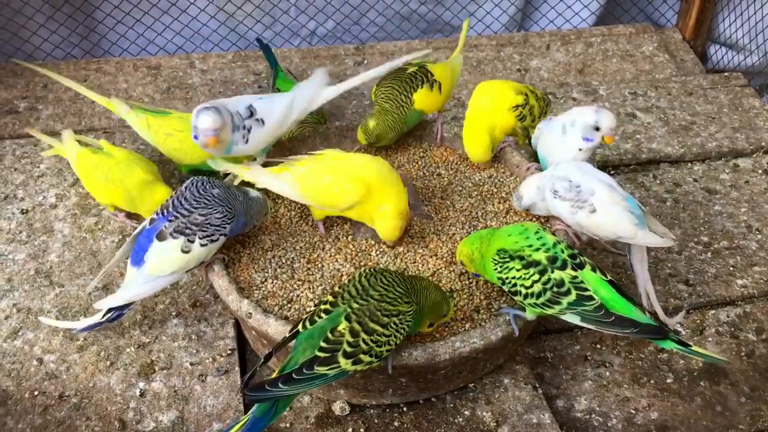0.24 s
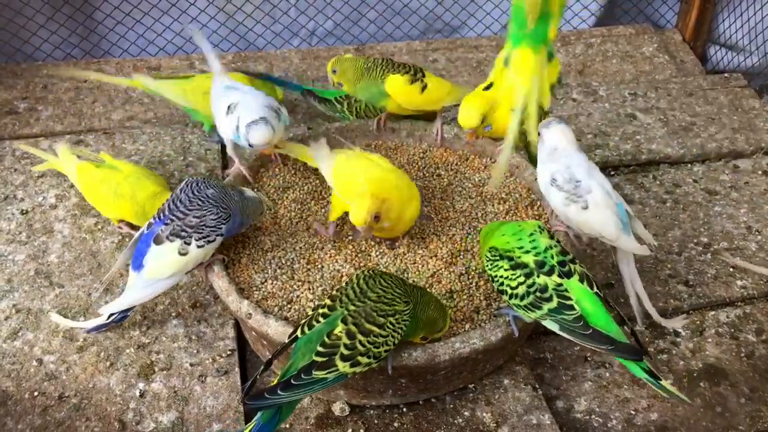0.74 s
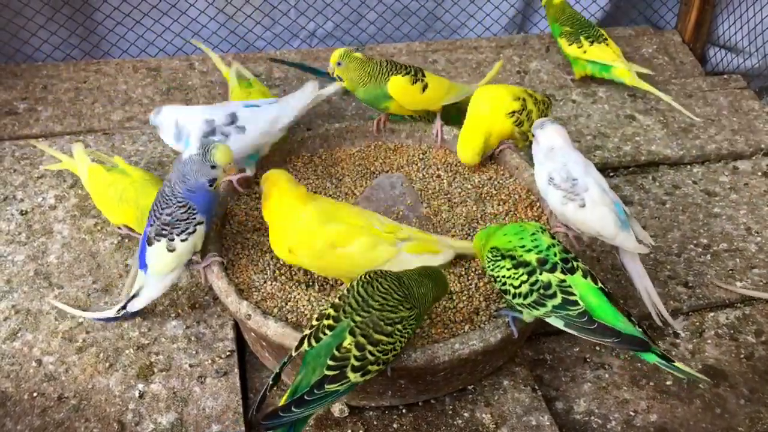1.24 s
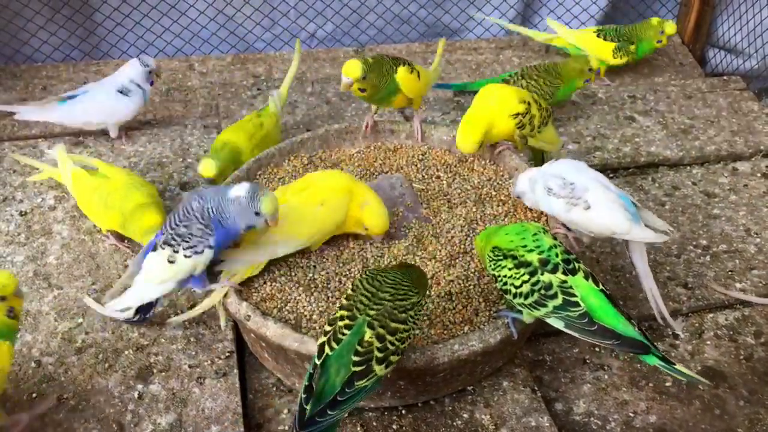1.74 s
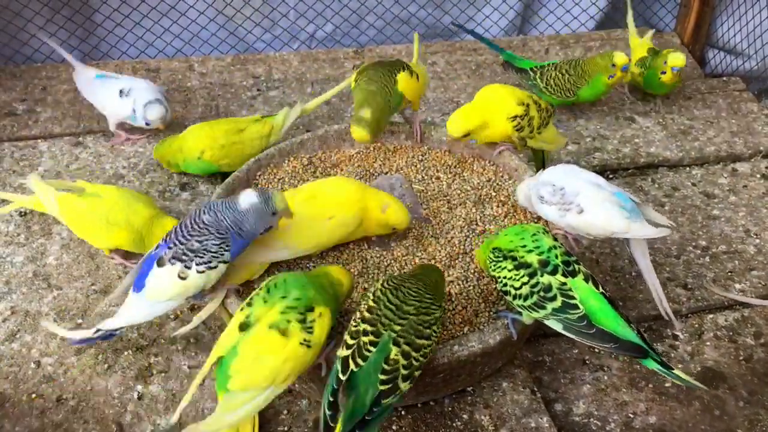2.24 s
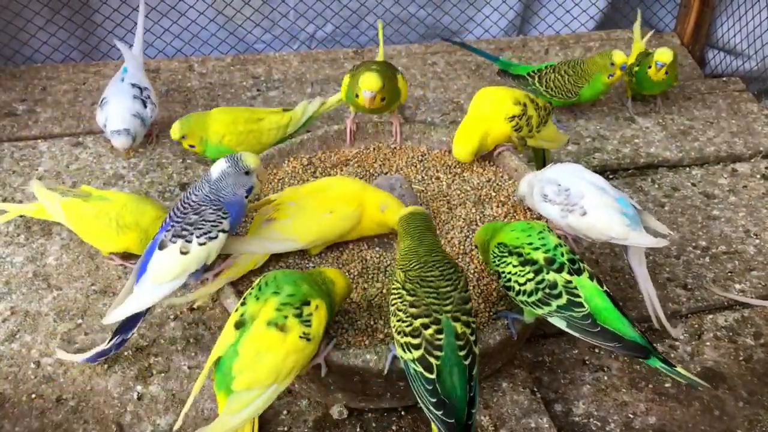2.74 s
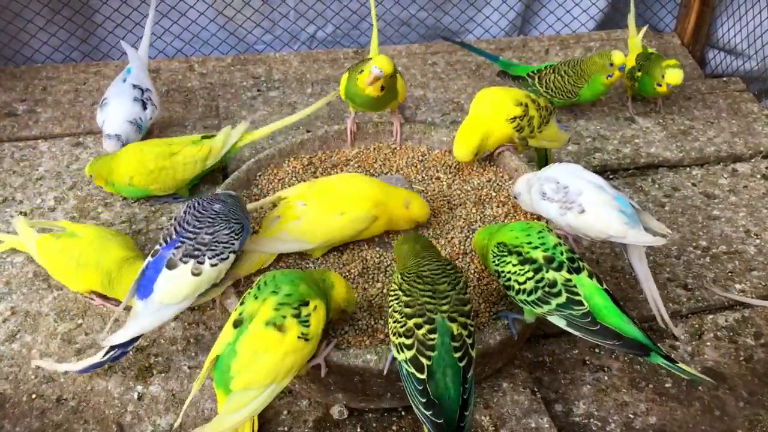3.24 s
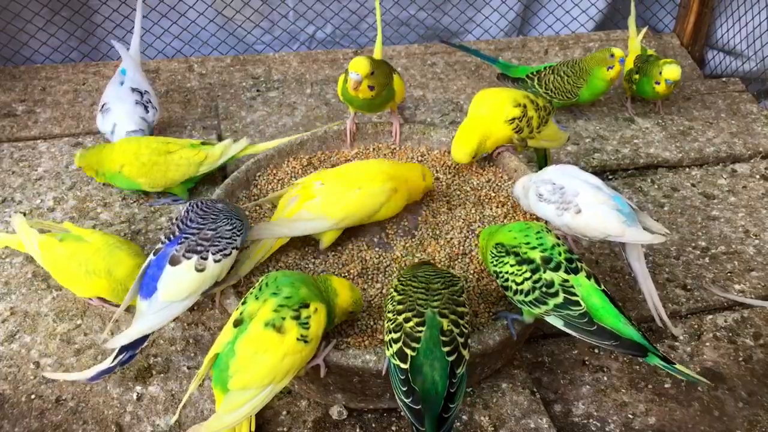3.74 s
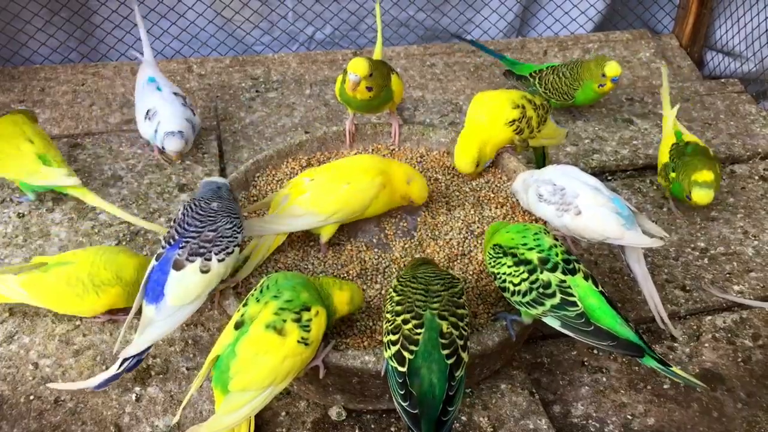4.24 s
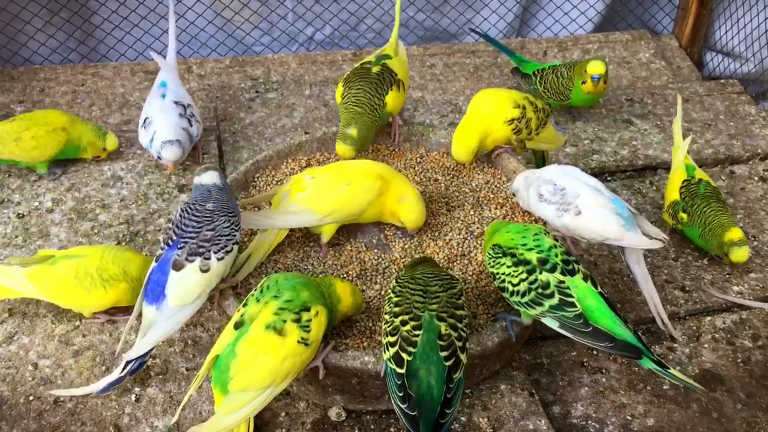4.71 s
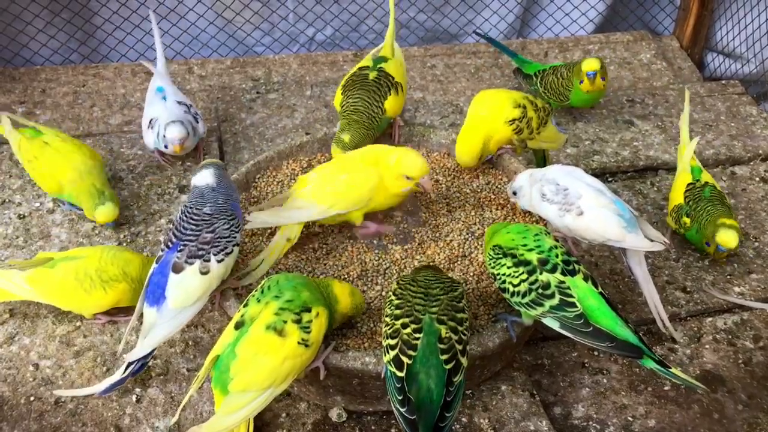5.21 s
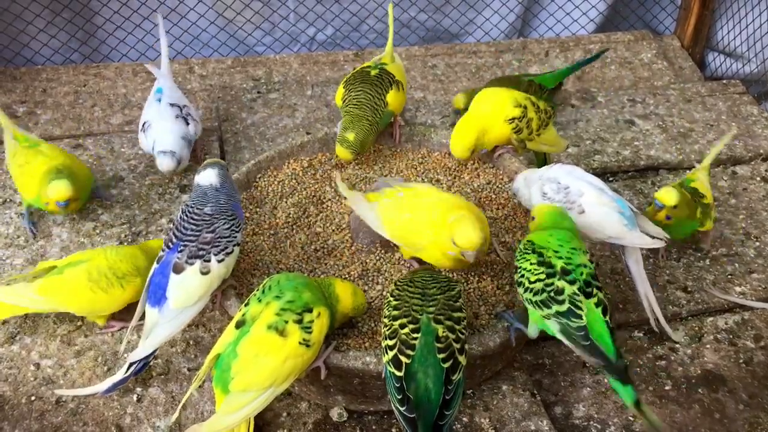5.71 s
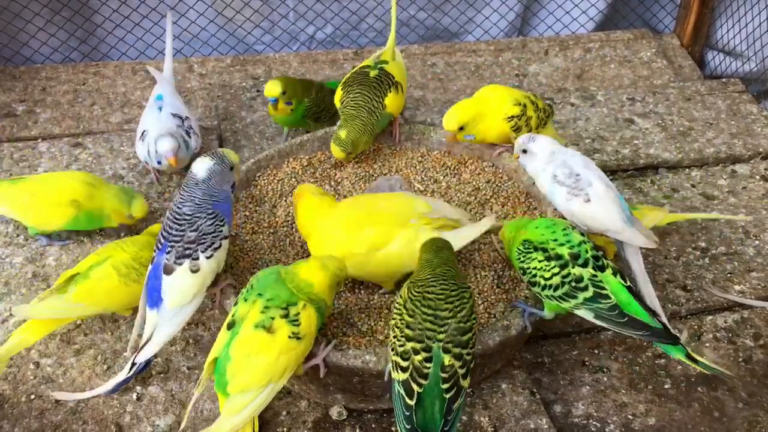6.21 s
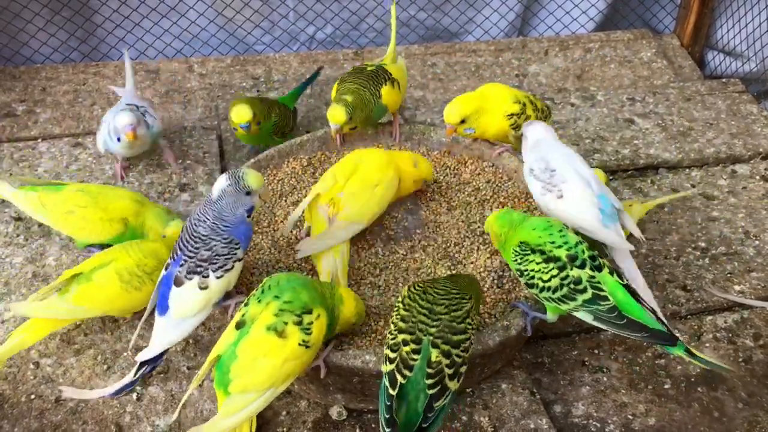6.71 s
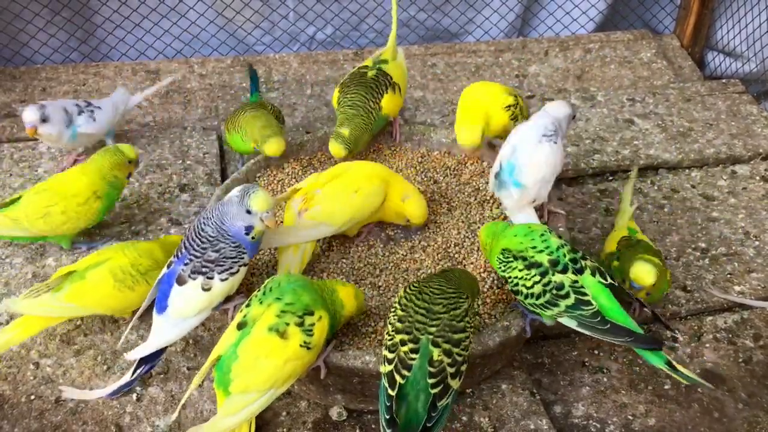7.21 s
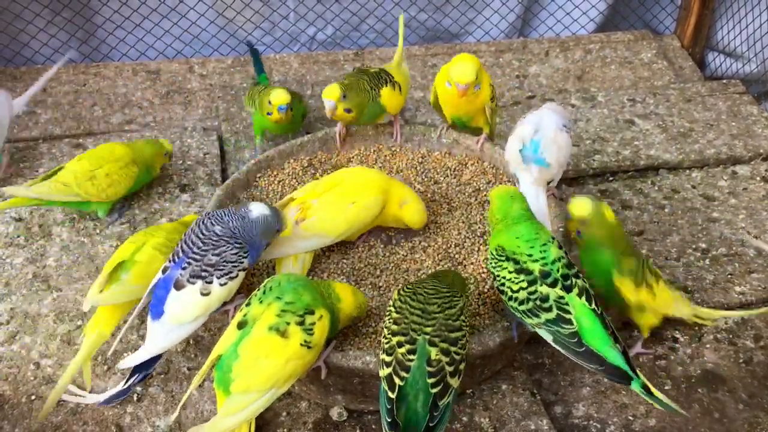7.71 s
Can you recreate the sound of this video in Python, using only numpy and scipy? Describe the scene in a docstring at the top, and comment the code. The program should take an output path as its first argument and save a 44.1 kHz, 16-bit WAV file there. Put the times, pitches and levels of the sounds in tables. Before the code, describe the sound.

Budgerigars chirp, warble and rasp over one another in an aviary, with wing flutters, cracking seed husks and two loud squawks.

```python
"""Budgerigars whistle, warble and rasp as they feed in an aviary; midway come two loud squawks.
The syrinx glides through hoarse notes, buzzes through throat and beak, or fires rapid bursts.
Wings beat the air near the microphone, feet thump a board and beaks crack seed husks.
A dove coos far off, and the walls answer the budgerigars briefly over an outdoor murmur."""
import sys
import numpy as np
from scipy import signal
from scipy.fft import rfft, irfft, next_fast_len
from scipy.io import wavfile
from scipy.ndimage import uniform_filter1d, map_coordinates

SR = 44100
rng = np.random.default_rng(int(sys.argv[2]) if len(sys.argv) > 2 else 0)


def digitize_waveform(pressure):
    """Quantize a signal to 16-bit integers and store it at the path in sys.argv[1].

    Rows of a 2-D input are taken as channels; values are limited to [-1, 1].
    """
    field = np.atleast_2d(pressure).T
    bounded = np.clip(field, -1, 1)
    quanta = np.round(bounded * 32767).astype(np.int16)
    wavfile.write(sys.argv[1], SR, quanta)


N = 350595


def amp(db):
    return 10 ** (np.asarray(db) / 20)


def unit_rms(x):
    return x / np.sqrt(np.mean(x ** 2) + 1e-20)


def along(points, hz):
    """Interpolate (hz, value) points on a log frequency axis."""
    knots_hz, values = np.transpose(points)
    return np.interp(np.log(hz + 1), np.log(knots_hz + 1), values)


def curves(rows):
    """One value per sample for each column after the time."""
    times_s, *columns = np.transpose(rows)
    return [np.interp(np.arange(N) / SR, times_s, column) for column in columns]


def wobble(knots_per_s, n=N):
    """Smooth random curve."""
    knots = rng.standard_normal(int(n * knots_per_s / SR) + 4)
    return map_coordinates(knots, [np.arange(n) * knots_per_s / SR])


def filtered(x, response):
    """Apply a complex frequency response."""
    size = next_fast_len(len(x) + 4096)
    return irfft(rfft(x, size) * response(np.fft.rfftfreq(size, 1 / SR)), size)[:len(x)]


def resonance(f, hz, width_hz):
    """Causal resonance, gain 1 at its centre."""
    return 1j * f * width_hz / (hz * hz - f * f + 1j * f * width_hz)


def add(track, start_s, sound):
    part = track[round(start_s * SR):][:len(sound)]
    part += sound[:len(part)]


def noise(n, response):
    """Filtered noise, rms 1."""
    return unit_rms(filtered(rng.standard_normal(n), response))


def patchy_noise(spectrum, patchy_db):
    """Noise with patches of random gain in time and frequency, rms 1."""
    bins = signal.stft(rng.standard_normal(N + 512), nperseg=512)[2]
    patches = uniform_filter1d(rng.standard_normal(bins.shape), 5, axis=0)
    patches = unit_rms(uniform_filter1d(patches, 8, axis=1))
    mottled = signal.istft(bins * amp(patchy_db * patches), nperseg=512)[1][:N]
    return unit_rms(filtered(mottled, lambda hz: amp(along(spectrum, hz))))


# Outdoor levels: time_s, murmur_db, flock_db, rumble_db
OUTDOOR_LEVELS = [(0, -56, -54, -50.5), (.6, -52.5, -49.5, -48), (1.7, -51.5, -52, -55.5),
                  (2.4, -57, -50.5, -42), (2.65, -55, -59, -65.5), (3.1, -50, -58.5, -72.5),
                  (4.5, -52.5, -52, -50), (5.0, -55.5, -60, -51.5), (6.3, -53.5, -54.5, -53.5),
                  (7.25, -54, -54, -50), (7.95, -53.5, -43, -50.5)]
# Noise spectra: freq_hz, density_db
MURMUR_SPECTRUM = [(70, 1.5), (130, -3), (250, -6), (550, -6), (1100, -8), (1800, -24), (4000, -34.5),
                   (9000, -40.5), (15500, -50)]
FLOCK_SPECTRUM = [(900, -24.5), (1500, -11), (2500, -2), (4000, -5.5), (7000, -9), (12000, -22)]

def outdoors():
    """The blur of a distant flock, a low rumble and a murmur, each wavering in level."""
    murmur_db, flock_db, rumble_db = curves(OUTDOOR_LEVELS)
    flock = amp(flock_db - 4 + 3 * wobble(14)) * patchy_noise(FLOCK_SPECTRUM, patchy_db=2.5)
    rumble = amp(rumble_db + 3.5 + 2.2 * wobble(6.9)) * noise(N, lambda f: resonance(f, 46, 70) ** 2)
    murmur = amp(murmur_db + 3 + 2 * wobble(5)) * patchy_noise(MURMUR_SPECTRUM, patchy_db=1.5)
    return flock + rumble + murmur


# Aviary decay: freq_hz, t60_s
WALL_DECAY = [(200, 0.53), (3000, 0.2), (10000, 0.05)]

def wall_reverb(x):
    """The walls answer with a short tail whose treble dies first."""
    hz, t, bins = signal.stft(rng.standard_normal(SR // 2), SR, nperseg=256)
    decay = amp(-60 * t / along(WALL_DECAY, hz)[:, None])
    tail = signal.istft(bins * decay, SR, nperseg=256)[1]
    delayed = np.pad(x, (200, 0))
    return signal.fftconvolve(delayed, tail / np.linalg.norm(tail))[:N]


def far_twitter():
    """Birds farther back chirp at random, following the flock's level."""
    when, length, pitch, *bends, softness = rng.random((70, 7)).T
    glide_hz = (1300 + 2200 * pitch) * (.85 + .36 * np.array(bends))
    second_db = np.full_like(when, -14)
    notes = np.transpose([when * N / SR, 12 + 25 * length, *glide_hz, -8 * softness, second_db])
    flock_db = curves(OUTDOOR_LEVELS)[1]
    return syrinx(notes, gain_db=6) * amp(flock_db)


# Coos: start_s, length_s, start_hz, end_hz, level_db
DOVE_COOS = [(3.19, 0.23, 281, 281, -40.5), (3.399, 0.68, 284, 291, -45.5), (7.463, 0.38, 286, 248, -43.5)]

def dove(ramp_s=.049, fade_db=22.5, fade_s=.28):
    """A soft, husky coo: its strength stumbles so fast that the pitch blurs."""
    out = np.zeros(N)
    for start_s, length_s, start_hz, end_hz, level_db in DOVE_COOS:
        n = round(length_s * SR)
        t = np.arange(n) / SR
        glide_hz = start_hz + (end_hz - start_hz) * t / length_s
        phase = 2 * np.pi * np.cumsum(glide_hz * (1 + .025 * wobble(25, n))) / SR
        husky = unit_rms(.7 + .9 * wobble(70, n))
        tone = np.sin(phase) + amp(-15) * np.sin(2 * phase) + amp(-19.5) * np.sin(3 * phase)
        gate = np.clip(np.minimum(t, length_s - t) / ramp_s, 0, 1)
        fade = amp(-fade_db * (1 - np.exp(-t / fade_s)))
        add(out, start_s, amp(level_db + 11.5) * gate * fade * husky * tone)
    return out


# Footfalls: start_s, level_db, tilt_db_per_octave
FOOTFALLS = [(1.458, -32, 5.5), (2.436, -17, -8.5), (2.466, -31, -17), (2.693, -37, 10.5), (2.708, -38, 9),
             (2.724, -34, 10.5)]
# Board modes: freq_hz, level_db, t60_s
BOARD_MODES = [(125, -7.5, .07), (210, 5, 0.033), (340, 1.5, 0.047), (500, -17, 0.03)]

def landings(attack_s=.001, scuffle_t60_s=.18):
    """Feet thump the board: a short low ring and a scuffle of claws."""
    out, t = np.zeros(N), np.arange(SR // 5) / SR
    attack = 1 - np.exp(-t / attack_s)
    for start_s, level_db, tilt in FOOTFALLS:
        ring = sum(amp(mode_db + tilt * np.log2(hz / 250) - 60 * t / t60_s) * np.sin(2 * np.pi * hz * t)
                   for hz, mode_db, t60_s in BOARD_MODES)
        claws = noise(len(t), lambda f: resonance(f, 400, 570) ** 2)
        scuffle = .3 * claws * amp(tilt - 60 * t / scuffle_t60_s)
        add(out, start_s, -amp(level_db) * (ring + scuffle) * attack)
    return out


# Flights: start_s, length_s, beat_hz, stroke_db, draught_db, draught_hold_s
FLY_PASTS = [(0.252, 0.33, 18, -26.5, -25, 0.046), (0.698, 0.27, 9.8, -34, -34.5, 0.025),
             (1.248, 0.22, 20.5, -30.5, -28, 0.035), (2.001, .02, 20, -27.5, -46, .01),
             (2.1, 0.32, 19.8, -26, -27.5, 0.065)]
# Draught spectrum: freq_hz, density_db
DRAUGHT_SPECTRUM = [(13, -33), (22, -11), (43, 3), (70, -3.5), (275, -28), (322, -32), (400, -33.5),
                    (520, -56), (880, -120)]

def wings(jitter_s=.004, edge_drop_db=7.5, upstroke_db=-7, draught_rise_s=.059, draught_fall_s=.11):
    """Strokes whoosh through feathers, downstrokes thump the air; the draught buffets the microphone."""
    def feathers(f):
        body = resonance(f, 499, 140) ** 2 - amp(-12) * resonance(f, 840, 690) ** 2
        return body + amp(-35) * resonance(f, 2900, 5400)

    strokes, draught = np.zeros(N), np.zeros(N)
    t, clock_s = np.arange(SR // 12) / SR, np.arange(N) / SR
    envelope = (t / .008 * np.exp(1 - t / .008)) ** 1.1
    thump = amp(7) * np.sin(2 * np.pi * 62 * t) * (t / .017 * np.exp(1 - t / .01)) ** 2
    for start_s, length_s, beat_hz, stroke_db, draught_db, hold_s in FLY_PASTS:
        beats = int(length_s * beat_hz) + 1
        for k, (late, loud) in enumerate(rng.standard_normal((12, 2))[:beats]):
            edge = (2 * k / (beat_hz * length_s) - 1) ** 2
            gain = amp(stroke_db - 7.5 - edge_drop_db * edge + .5 * loud)
            down = envelope * noise(len(t), feathers) + thump
            up = amp(upstroke_db) * envelope * noise(len(t), lambda f: feathers(f / 1.25))
            add(strokes, start_s + k / beat_hz + jitter_s * late - .006, gain * down)
            add(strokes, start_s + (k + .5) / beat_hz, gain * up)
        end_s = start_s + length_s + hold_s
        rise = np.clip((clock_s - start_s) / draught_rise_s + .5, 0, 1)
        fall = np.clip((end_s - clock_s) / draught_fall_s + 1, 0, 1) ** 2
        draught += amp(draught_db) * rise * fall
    buffeting = unit_rms(amp(3 * wobble(19)) * patchy_noise(DRAUGHT_SPECTRUM, patchy_db=3))
    return strokes + draught * buffeting


# Husk cracks: start_s, level_db
HUSK_CRACKS = [(0.2823, -45), (0.7382, -40), (0.8036, -37), (1.0121, -41), (1.7325, -53), (1.7714, -60),
               (1.9275, -38), (1.9634, -40), (2.0557, -37), (2.4917, -39), (2.5376, -43), (2.6823, -44),
               (2.6938, -38), (2.7691, -51), (3.0415, -38.5), (3.1697, -41), (3.263, -48), (3.4111, -44),
               (3.4401, -45), (3.8921, -49), (3.9804, -40), (4.2712, -48), (4.3031, -46), (4.7676, -43),
               (5.5618, -40), (5.6027, -45), (5.9065, -32), (6.0227, -35.5), (6.2362, -44), (6.2592, -35),
               (6.355, -34), (6.3764, -34), (6.4832, -36), (6.6029, -39), (6.762, -37), (6.8912, -36),
               (7.0199, -51), (7.2514, -55), (7.2898, -52), (7.4599, -49), (7.5562, -39), (7.8062, -43)]

def husks(faint_count=280, t60_s=.004):
    """Beaks crack seed husks in sharp, bright ticks; many fainter ones fall at random."""
    out, t = np.zeros(N), np.arange(SR // 200) / SR
    faint = [(when * N / SR, -45 - 13 * softness) for when, softness in rng.random((faint_count, 2))]
    for start_s, level_db in list(HUSK_CRACKS) + faint:
        crack = rng.standard_normal(len(t)) * amp(-60 * t / t60_s)
        add(out, start_s, amp(level_db + 17.5) * crack / np.linalg.norm(crack))
    return filtered(out, lambda f: resonance(f, 7300, 9000) - amp(-7.5) * resonance(f, 5400, 3500))


# One bird's phrases: level_db, turning points as (time_s, pitch_hz)
WARBLE_PHRASES = [(-48, [(4.33, 895), (4.35, 1820), (4.36, 1640), (4.375, 2510), (4.382, 2220), (4.4, 2540),
                  (4.411, 1960), (4.427, 2580), (4.445, 2100)]), (-45, [(4.46, 1490), (4.477, 2280),
                  (4.49, 1800), (4.505, 1805), (4.511, 2450), (4.53, 1900), (4.543, 1547)]),
                  (-50, [(4.545, 1540), (4.555, 1806), (4.58, 1260), (4.607, 2055), (4.625, 1580),
                  (4.637, 1710), (4.658, 1400)]), (-47.5, [(4.662, 950), (4.677, 1714), (4.705, 1062),
                  (4.727, 1350), (4.745, 1500)]), (-50.5, [(4.754, 2150), (4.773, 1555), (4.785, 1870),
                  (4.815, 1260), (4.824, 990), (4.838, 1538), (4.862, 1150)]), (-48, [(5.195, 1390),
                  (5.21, 1288), (5.224, 1730), (5.24, 1206), (5.253, 1040), (5.262, 1250)]),
                  (-46, [(5.28, 1325), (5.291, 2016), (5.302, 1440), (5.308, 2230), (5.315, 1613),
                  (5.33, 1700), (5.34, 1350), (5.348, 1560), (5.358, 1300)]), (-51, [(5.443, 1560),
                  (5.452, 1370), (5.465, 1605), (5.478, 1477), (5.487, 1620), (5.502, 1210), (5.515, 1370),
                  (5.545, 1057), (5.556, 1250)]), (-51, [(5.578, 2270), (5.6, 1610), (5.612, 1850),
                  (5.62, 1450), (5.632, 1580), (5.65, 1220), (5.662, 1300)]), (-47.5, [(6.148, 1790),
                  (6.16, 1420), (6.168, 1660), (6.174, 1468), (6.185, 2110), (6.203, 1410), (6.218, 1480)]),
                  (-45.5, [(6.24, 870), (6.254, 1720), (6.264, 1494), (6.283, 1867), (6.303, 1110)]),
                  (-46, [(6.311, 856), (6.328, 1770), (6.345, 1290), (6.357, 1170), (6.363, 1580)]),
                  (-46.5, [(6.393, 1810), (6.402, 1385), (6.425, 1800), (6.438, 1150), (6.448, 1010),
                  (6.466, 1780), (6.495, 1110), (6.507, 1500)]), (-51, [(6.52, 2216), (6.536, 1595),
                  (6.556, 1893), (6.58, 1440), (6.588, 1140), (6.606, 1710), (6.632, 1175), (6.65, 1620)]),
                  (-49.5, [(6.66, 2380), (6.675, 1500), (6.685, 1804), (6.698, 1460), (6.715, 1530)]),
                  (-49, [(7.345, 1220), (7.357, 1370), (7.375, 1005), (7.395, 1136), (7.425, 1200),
                  (7.437, 1500), (7.455, 1100), (7.475, 1090)]), (-48, [(7.581, 2470), (7.595, 1910),
                  (7.607, 2340), (7.622, 1750), (7.643, 1430)]), (-43.5, [(7.71, 1507), (7.718, 1653),
                  (7.732, 1280), (7.755, 1393), (7.775, 1636), (7.825, 1650), (7.845, 1415),
                  (7.865, 1080)])]

def warble(throat_hz=4170, ramp_s=.0013):
    """A hoarse voice slides up and down; its 2nd partial is strong near the throat's resonance."""
    out = np.zeros(N)
    for level_db, turns in WARBLE_PHRASES:
        turn_s, turn_hz = np.transpose(turns)
        t = np.arange(turn_s[0], turn_s[-1], 1 / SR)
        n = len(t)
        glide_hz = uniform_filter1d(np.interp(t, turn_s, turn_hz), size=220, mode="nearest")
        pitch_hz = glide_hz * (1 + .02 * wobble(400, n))
        phase = 2 * np.pi * np.cumsum(pitch_hz) / SR
        throat = amp(4) * np.abs(resonance(2 * pitch_hz, throat_hz, 2250))
        second = throat * np.abs(.31 + .5 * wobble(125.7, n))
        hoarse = amp(3 * wobble(90, n)) + .24 * wobble(1500, n)
        third = amp(-22) * np.abs(wobble(80, n))
        tone = np.sin(phase) + second * np.sin(2 * phase) + third * np.sin(3 * phase)
        gate = np.clip(np.minimum(t - turn_s[0], turn_s[-1] - t) / ramp_s, 0, 1)
        add(out, turn_s[0], amp(level_db + 5) * gate * hoarse * tone)
    return out


def syrinx(notes, gain_db, third_drop_db=6.5, drop_db_per_khz=.5):
    """The syrinx glides through three pitches a note, hoarse and fluttering, its overtones breaking up."""
    out = np.zeros(N)
    for start_s, length_ms, start_hz, middle_hz, end_hz, level_db, second_db in notes:
        n = round((length_ms + 4) * SR / 1000)
        progress = np.arange(n) / n
        bow_hz = (2 * middle_hz - start_hz - end_hz) * 2 * progress * (1 - progress)
        glide_hz = start_hz + (end_hz - start_hz) * progress + bow_hz
        waver = min(40 / length_ms, 1)  # long notes waver less
        flutter = 1 + .016 * waver * wobble(400, n) + .03 * waver ** 2 * wobble(70, n)
        phase = 2 * np.pi * np.cumsum(glide_hz * flutter) / SR
        third_db = second_db - third_drop_db - drop_db_per_khz * middle_hz / 1000
        overtones_db = [second_db, third_db, second_db - 26, third_db - 21]
        overtones = sum(amp(db) * np.sin(k * phase) for k, db in enumerate(overtones_db, 2))
        hoarse = amp(1.9 * wobble(260, n)) + .35 * wobble(1500, n)
        breaking = np.abs(.8 + .4 * wobble(200, n))
        tone = np.sin(phase) + breaking * overtones
        envelope = np.sin(np.pi * progress ** .9) ** .4
        add(out, start_s - .001, amp(level_db + gain_db) * envelope * hoarse * tone)
    return out


# Whistles: start_s, length_ms, start_hz, middle_hz, end_hz, level_db, second_partial_db
WHISTLED_NOTES = [(.056, 14, 4320, 4110, 3950, -39, -5), (.066, 31, 4300, 3320, 3220, -35.5, -15),
                  (.088, 29, 4550, 4300, 4200, -36, -14.5), (.111, 36, 2910, 3070, 3120, -41.5, -10),
                  (.124, 16, 2780, 3900, 4740, -32, -14), (.153, 26, 3900, 3830, 3940, -33.5, -23),
                  (.209, 26, 3455, 3340, 3580, -39, -17), (.298, 23, 3900, 3580, 3720, -46.5, -16),
                  (.455, 50, 4000, 2800, 1800, -48, -6), (.515, 19, 1960, 2160, 2520, -46.5, -13),
                  (.554, 15.4, 4400, 3780, 3340, -41, -2), (.563, 31, 3400, 3060, 2900, -36.5, -8.5),
                  (.598, 12, 2580, 2490, 2130, -36, -20), (.611, 24, 3260, 3300, 3270, -39, -12),
                  (.624, 9.3, 2260, 2290, 2280, -35.5, -17), (.64, 19, 4170, 3610, 3600, -36, -14),
                  (.657, 32.4, 3300, 3054, 3240, -27, -24), (.894, 26, 2610, 2540, 2410, -39.5, -20),
                  (.913, 33, 2410, 2760, 2490, -46, -11), (.957, 28, 2670, 2446, 2220, -47, 1),
                  (1.037, 8.2, 1580, 1310, 1280, -46.5, 0), (1.131, 7, 4070, 4230, 3875, -42.5, 1),
                  (1.149, 13, 3230, 3320, 3400, -38.5, -4), (1.17, 7.4, 2120, 1910, 1120, -40, -7),
                  (1.172, 9.3, 3105, 3280, 3300, -31.5, -4), (1.187, 33, 2010, 2520, 2960, -33.5, -4.5),
                  (1.214, 21, 3320, 3280, 2300, -33.5, -8), (1.248, 17, 3190, 3620, 3000, -35, 1.5),
                  (1.318, 15, 2370, 3140, 3500, -36, 3.5), (1.332, 16.6, 1920, 2380, 2730, -36.5, 1),
                  (1.455, 17, 4320, 3240, 2605, -42, -7), (1.463, 5.9, 2640, 2243, 1710, -33, -14),
                  (1.472, 17, 1180, 1300, 1070, -47, 8.5), (1.507, 23, 2590, 2210, 2565, -50, -1),
                  (1.858, 42, 2500, 2442, 2270, -35.5, -8.5), (1.902, 23, 2590, 2660, 2080, -37.5, -24),
                  (1.924, 16.5, 1770, 1290, 1280, -48.5, 2), (2.054, 16, 2200, 2210, 2200, -49, -12),
                  (2.1, 26, 2440, 2183, 2040, -50, -6.5), (2.411, 19, 2170, 2330, 2370, -44, -16),
                  (2.783, 17, 810, 1567, 1700, -45.5, 0), (3.321, 13, 3120, 3030, 3270, -46, -35),
                  (3.771, 17, 1213, 1150, 1180, -53, 9.5), (3.944, 24, 2060, 1780, 1640, -49.5, -4),
                  (3.974, 13.5, 1400, 1364, 1305, -45.5, -3), (3.993, 38, 1187, 1127, 1135, -51.5, 4),
                  (4.057, 7.6, 1000, 1003, 1040, -39.5, -7), (4.07, 11, 6970, 6600, 6070, -32, -30),
                  (4.07, 20, 1350, 1197, 930, -44, 4), (4.103, 21, 7200, 6730, 6250, -40, -30),
                  (4.111, 30, 1690, 1550, 1480, -47.5, 5), (4.137, 10, 1260, 1240, 1245, -47.5, 0.5),
                  (4.15, 13, 1130, 1118, 1205, -46, -4), (4.168, 22, 1480, 1460, 1295, -50, 1),
                  (4.199, 33.4, 1410, 980, 1110, -44.5, -11.5), (4.55, 330, 5105, 5100, 5095, -74, -23),
                  (4.346, 29, 3750, 3790, 3970, -44.5, -25), (5.143, 7.7, 1720, 1666, 1724, -43.5, 5),
                  (5.159, 9.7, 2170, 2290, 2130, -44, -7), (5.168, 13.6, 1640, 1237, 1140, -45, -3),
                  (5.287, 16, 3630, 3930, 3730, -31.5, -14), (5.3, 120, 1160, 1140, 1110, -53.5, -15),
                  (5.435, 24, 4410, 3990, 3900, -43, -40), (5.583, 19, 4190, 3840, 3220, -44, -19),
                  (5.67, 138, 1173, 1143, 1137, -50, -16), (5.83, 89, 1010, 977, 975, -58, -25),
                  (5.848, 8, 2610, 2550, 2400, -44, -6), (5.923, 7.8, 2350, 2290, 2150, -49, 0),
                  (6.114, 18, 2260, 2190, 1480, -45.5, 5), (6.366, 15, 3140, 3090, 3100, -45, -8),
                  (6.383, 9, 2520, 2380, 2395, -37, -33), (6.398, 9.4, 1260, 1290, 1290, -53.5, 10),
                  (6.422, 33, 1350, 1107, 1320, -59.5, 15), (6.51, 188, 958, 1047, 1080, -59, -25),
                  (6.869, 7.7, 2070, 1960, 1940, -43, -21), (6.952, 8.6, 2030, 1900, 1595, -43.5, -9),
                  (7.037, 9.7, 1230, 1370, 1640, -50.5, 8), (7.137, 9.2, 3530, 3730, 3850, -36, -10),
                  (7.158, 4.4, 3920, 3750, 3430, -26, -21.5), (7.168, 20.5, 3480, 2570, 1670, -41, -6.5),
                  (7.2, 35, 2640, 2290, 2060, -38, -13), (7.228, 26, 4160, 3810, 3570, -45.5, -30),
                  (7.332, 3.9, 1300, 1210, 1385, -44.5, 4), (7.34, 27, 2520, 2940, 2500, -42.5, -4),
                  (7.36, 36, 2400, 2100, 2080, -43.5, -7), (7.472, 13, 2270, 2330, 2305, -42.5, -29),
                  (7.498, 22, 2230, 2330, 2365, -46, -20), (7.528, 43, 2690, 2950, 2950, -47, -34),
                  (7.563, 5.2, 1740, 1720, 1705, -43, -22), (7.657, 18, 2280, 3170, 3160, -42.5, -21),
                  (7.662, 13, 1900, 2320, 2140, -42, -29), (7.764, 11, 2975, 3240, 3120, -43.5, -23),
                  (7.775, 21.5, 2075, 2320, 2820, -46, 0)]
# Chirps: start_s, length_ms, top_hz, level_db
ARCHED_CHIRPS = [(0.381, 20, 2800, -42), (1.019, 15, 2750, -40), (1.079, 11, 2890, -40.5),
                 (1.117, 11.5, 3630, -38.5), (1.145, 27, 2730, -41), (1.242, 9.7, 3160, -35.5),
                 (1.265, 15, 3156, -40), (1.414, 9.8, 2530, -41.5), (5.718, 15.5, 2495, -42.5),
                 (5.787, 11, 2530, -39), (5.997, 8.5, 2540, -43.5), (6.07, 9.6, 2430, -42.5),
                 (6.143, 13, 2410, -42.5), (7.94, 7.3, 3150, -44)]
# Soft song: start_s, length_s, level_db
SONG_RUNS = [(0, .55, -57), (3.882, .18, -57), (6.76, .09, -55), (7.483, .22, -51.5), (7.85, .09, -48.5)]

def whistles(syllable_step_s=.024, song_hz=2140, pitch_spread=.2):
    """Near birds whistle notes, bright up-and-down chirps and soft runs of falling syllables."""
    notes = list(WHISTLED_NOTES)
    for start_s, length_ms, top_hz, level_db in ARCHED_CHIRPS:
        notes.append((start_s, length_ms, .78 * top_hz, top_hz, .902 * top_hz, level_db, 4))
    syllable_ms = 700 * syllable_step_s
    for start_s, length_s, level_db in SONG_RUNS:
        syllables = int(length_s / syllable_step_s)
        for k, (late, pitch, bend, loud) in enumerate(rng.standard_normal((30, 4))[:syllables]):
            onset_s = start_s + syllable_step_s * (k + .3 * late)
            start_hz = song_hz * np.exp(pitch_spread * pitch)
            glide_hz = start_hz, start_hz * (.97 + .1 * bend), start_hz * .827
            notes.append((onset_s, syllable_ms, *glide_hz, level_db + 2.75 * loud, -3))
    return syrinx(notes, gain_db=10)


# Raspy calls: start_s, length_ms, level_db, throat_hz, beak_db
RASPY_CALLS = [(0.387, 16, -28, 2770, 18), (0.866, 27, -39, 3777, -1.5), (0.95, 42, -32, 2630, -39),
               (1.498, 71, -36.5, 2450, -4.5), (1.609, 90, -36, 3960, -5.5), (1.781, 118, -34.5, 2800, -3),
               (1.981, 12, -38.5, 2870, -5), (2.391, 19, -43, 2330, -34), (2.721, 36, -36, 2150, -0.5),
               (2.782, 21.7, -28, 3300, 0), (2.9, 20, -48, 2600, -8), (2.95, 60, -42, 2420, -13),
               (3.094, 24, -39.5, 2560, -31), (3.18, 38, -36.5, 2300, -27), (3.305, 36, -38, 2870, -45.5),
               (3.77, 46, -38.5, 2360, -26), (4.001, 50, -39.5, 2380, -40), (4.057, 48, -29.5, 3450, 1),
               (4.101, 48, -35, 3080, 26), (4.15, 86, -33.5, 3280, -8), (4.328, 46, -41.5, 3770, -3),
               (4.449, 210, -50, 3940, -4.5), (5.115, 13, -42.5, 4050, -14), (5.14, 41, -32, 3380, -3.5),
               (5.279, 53, -29, 3770, -32), (5.43, 32, -36.5, 3700, -15), (5.573, 28, -43.5, 3750, -56),
               (5.925, 10, -39.5, 2380, -23), (6.055, 31, -33.5, 3700, -5), (6.375, 58, -45.5, 2400, -3),
               (6.485, 29, -42, 3030, -5), (6.708, 18, -45, 2400, -4), (6.801, 29, -42, 2700, -27),
               (6.852, 30, -38, 2400, -4.5), (6.915, 10.5, -38.5, 4400, -29),
               (7.036, 18, -34.5, 3220, -7.5), (7.094, 22, -39, 3470, -6), (7.125, 6.3, -32.5, 2170, -32),
               (7.329, 32, -35.5, 2750, -40), (7.468, 75, -38.5, 2390, -9.5), (7.655, 93, -38.5, 2330, -25)]

def rasps(buzz_hz=1280, flutter_hz=170):
    """An unsteady syrinx buzz plus breath noise, chopped by a flutter, coloured by throat and beak."""
    out = np.zeros(N)
    for start_s, length_ms, level_db, throat_hz, beak_db in RASPY_CALLS:
        def tract(f):
            throat = resonance(f, throat_hz, 1060) - amp(-15.5) * resonance(f, 940, 1200)
            beak = amp(beak_db) * resonance(f, 7230, 3260)
            return (throat - beak) * resonance(f, 2800, 6350)

        n = round(length_ms * SR / 1000)
        flutter = np.cos(np.pi * np.cumsum(flutter_hz * (1 + .49 * wobble(56, n))) / SR) ** 2
        cycles = np.cumsum(buzz_hz * (1 + .16 * wobble(90, n) + .06 * wobble(600, n))) / SR
        pulses = unit_rms(np.diff(np.floor(cycles), prepend=0))
        breath = .45 * rng.standard_normal(n)
        voice = unit_rms(filtered((.4 + flutter) * (pulses + breath), tract))
        envelope = np.sin(np.pi * (np.arange(n) / n) ** .68) ** .59
        add(out, start_s, amp(level_db) * envelope * voice)
    return out


# Squawks: start_s, length_s, level_db, low_voice_hz, high_voice_hz, low_voice_db, breath_share
LOUD_SQUAWKS = [(3.4918, .051, 4.5, 3430, 6640, -18, 0.42), (3.657, .053, -3, 3820, 6060, -4, 0.61)]

def squawks(step_s=.0059, jitter_s=.00048, pitch_scatter=.03, loudest_at=.62, curvature_db=30.5):
    """A run of bursts that swells and drops; each is a snap of breath and two rising voices."""
    out, t = np.zeros(N), np.arange(SR // 100) / SR
    phase_per_hz = 2 * np.pi * (t + 9 * (t - .004) * t)
    voice_envelope = np.exp(-((t - .002) / .0015) ** 2)
    breath_envelope = .41 * np.exp(-t / .0047)
    for start_s, length_s, level_db, low_voice_hz, high_voice_hz, low_db, breath_share in LOUD_SQUAWKS:
        draws = rng.standard_normal((16, 5))[:int(length_s / step_s) + 1]
        for k, (late, low_detune, high_detune, balance, loud) in enumerate(draws):
            progress = k * step_s / length_s
            opening = np.clip(1.5 - 4 * progress, 0, 1)  # the low voice starts flatter and stronger
            low_hz = low_voice_hz * (1 - .25 * opening) * (1 + pitch_scatter * low_detune)
            high_hz = high_voice_hz * (1 + pitch_scatter * high_detune)
            low_gain = amp(low_db + 13.5 * opening + 4 * balance)
            voices = np.sin(high_hz * phase_per_hz) + low_gain * np.sin(low_hz * phase_per_hz)
            sum_tone = amp(-29.5) * np.sin((low_hz + high_hz) * phase_per_hz)
            voiced = voice_envelope * (voices + sum_tone) / (1 + low_gain)
            breath = breath_envelope * noise(len(t), lambda f: resonance(f, 5090, 6500) ** 3)
            breathiness = np.clip(breath_share + .24 * (1 - 2 * progress), 0, .9)
            burst = (1 - breathiness) * voiced + breathiness * breath
            burst_db = level_db - curvature_db * (progress - loudest_at) ** 2 + 1.5 * loud
            add(out, start_s + k * step_s + jitter_s * late, amp(burst_db) * burst)
    return out


def scene():
    far = far_twitter()
    calls = whistles() + warble() + rasps() + squawks()
    near = filtered(calls, lambda f: 1 / (1 + 1j * f / 9000) ** 2)  # beaks radiate little extreme treble
    reverb = wall_reverb(amp(-15.5) * near + amp(-7) * far)
    return (near + far + reverb + husks() + wings() + landings() + dove() + outdoors())[None]


def record(dry, ceiling=.98, low_cut_hz=32, top_hz=15950):
    """The microphone rounds off the loudest peaks, loses the deepest bass and stops at its band limit."""
    def passband(f):
        highpass = 1j * f / (low_cut_hz + 1j * f)
        return (f < top_hz) * highpass ** 3

    rounded = dry[0] / (1 + np.abs(dry[0] / ceiling) ** 6) ** (1 / 6)
    return filtered(rounded, passband)[None]


dry = scene()
out = record(dry)
digitize_waveform(out)
```